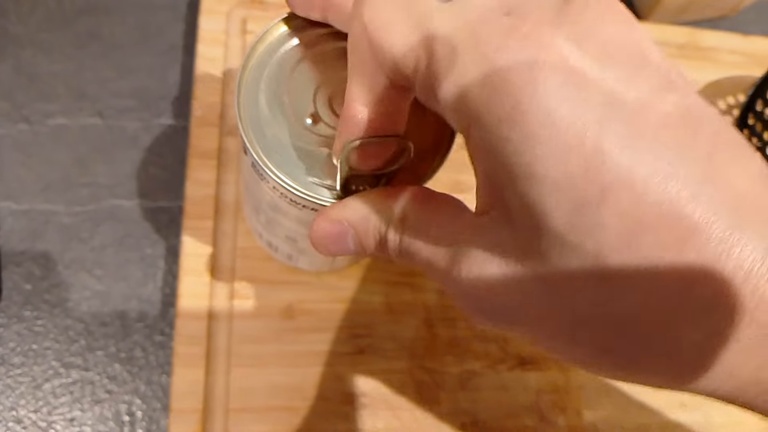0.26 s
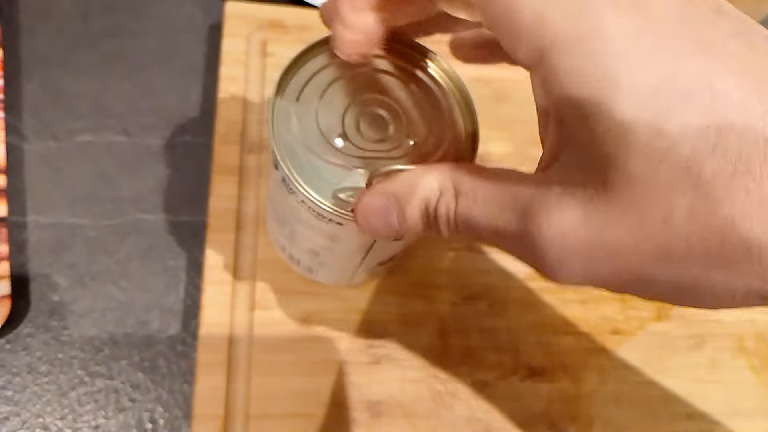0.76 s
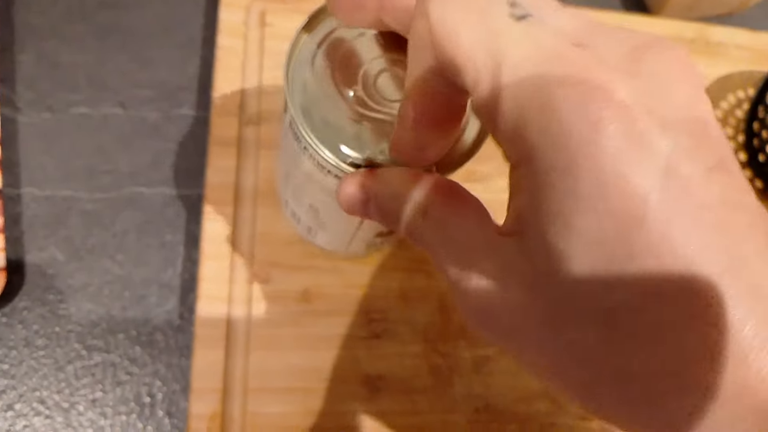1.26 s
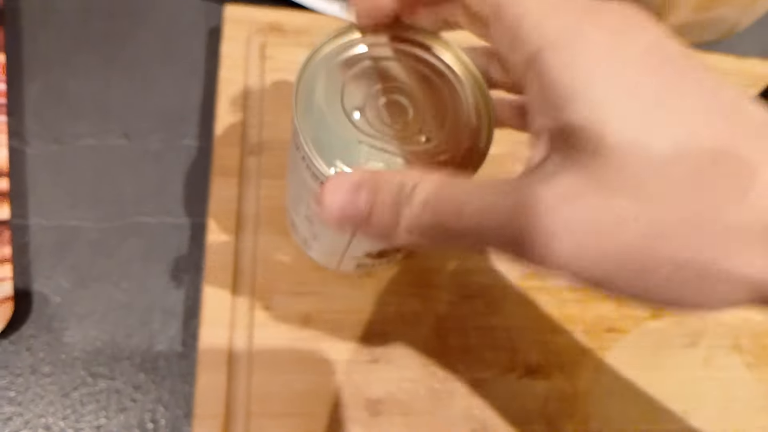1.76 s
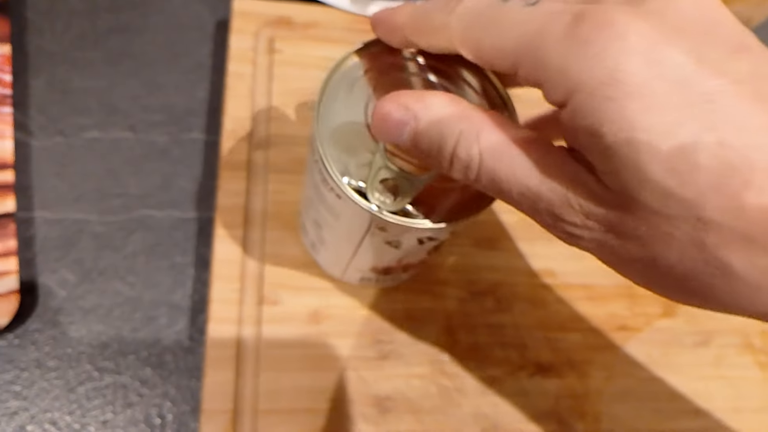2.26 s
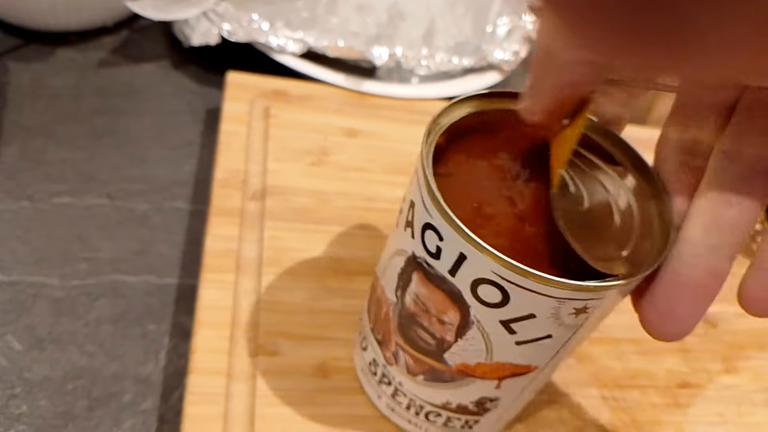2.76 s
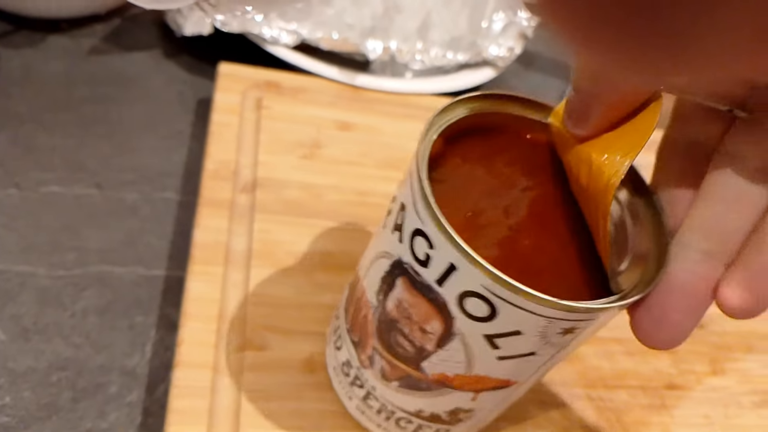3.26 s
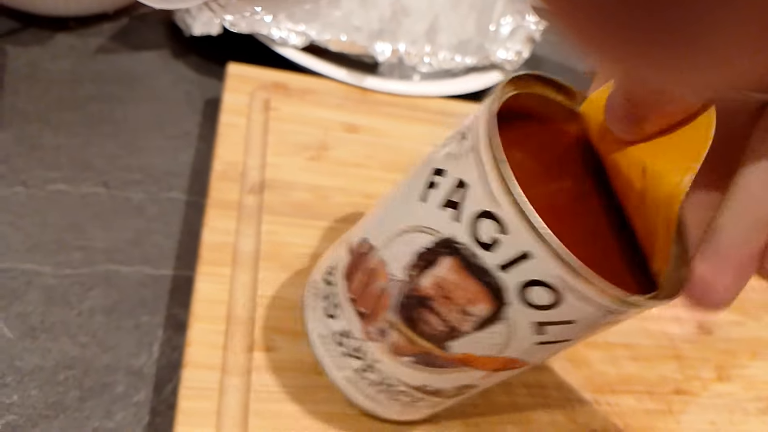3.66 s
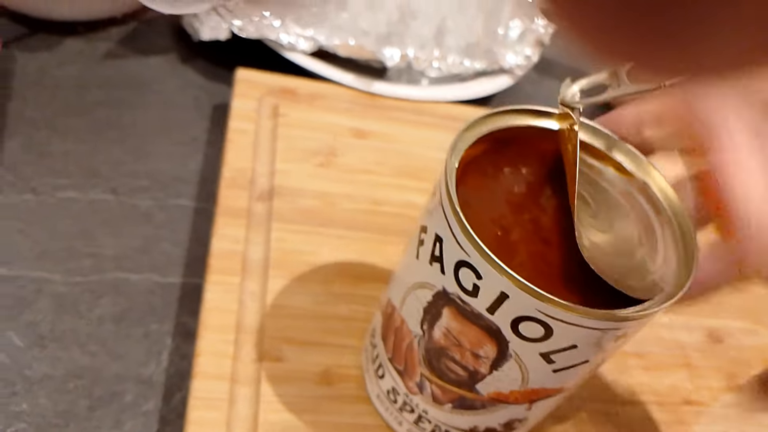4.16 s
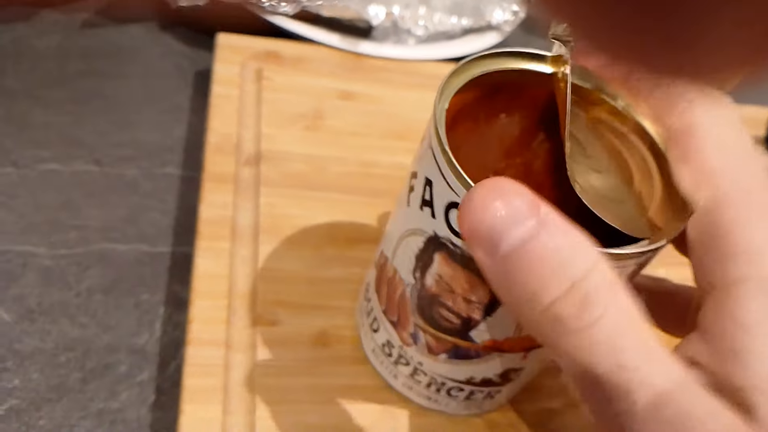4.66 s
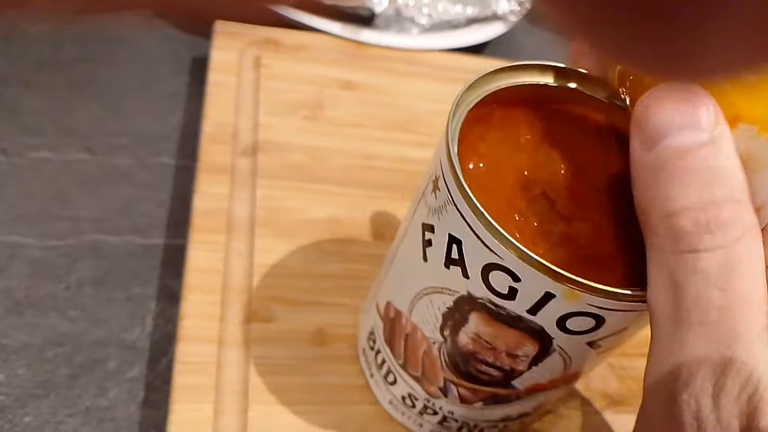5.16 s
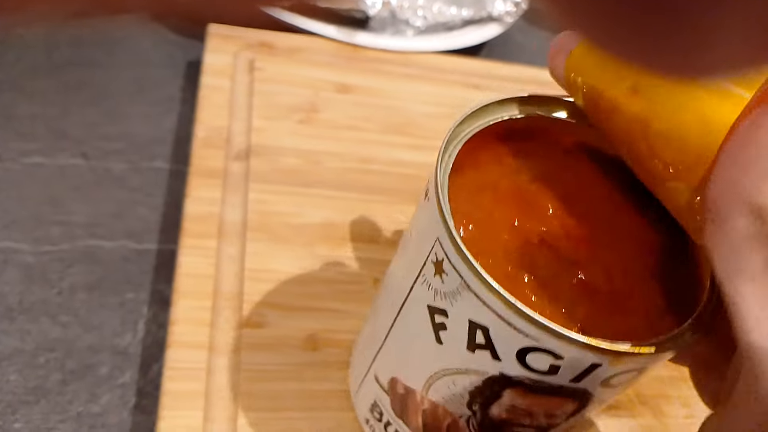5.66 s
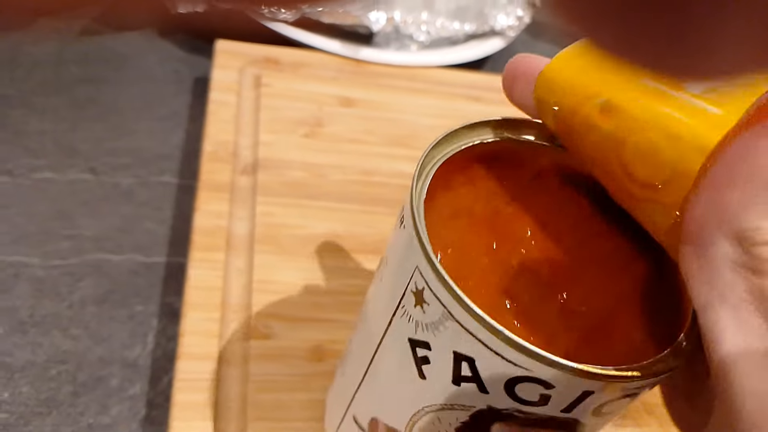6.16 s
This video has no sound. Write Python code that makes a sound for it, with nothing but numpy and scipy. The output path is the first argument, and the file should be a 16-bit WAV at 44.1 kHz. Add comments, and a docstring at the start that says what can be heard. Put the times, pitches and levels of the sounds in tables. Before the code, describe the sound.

Sharp metallic pops and small cracks as a can lid is peeled off, the full can clacking once on wood in a kitchen.

```python
"""A ring-pull tin of beans on a wooden board in a small, live kitchen, one microphone close by.
First the lid pops into new shapes as the tab pierces and lifts it. Then the scored seam tears in jerks;
midway the tin skids and drops flat. The lid snaps free near 5.1 s, and the tin knocks once more at the end.
Behind it all, a thin whine wavers over a quiet background hiss."""
import sys
import numpy as np
from scipy import signal
from scipy.fft import rfft, irfft, next_fast_len
from scipy.io import wavfile

SR = 44100
rng = np.random.default_rng(int(sys.argv[2]) if len(sys.argv) > 2 else 0)


def unload_audio(sound):
    """Save the sound as a 16-bit wav file, at the path given as the first command line argument."""
    columns = np.transpose(np.atleast_2d(sound))
    # keep every value between -1 and 1, then stretch to whole-number steps
    steps = np.round(np.clip(columns, -1, 1) * 32767)
    wavfile.write(sys.argv[1], SR, steps.astype(np.int16))


N = 282355
TIME = np.arange(N) / SR  # seconds through the scene
T = np.arange(int(.8 * SR)) / SR  # seconds through one short sound


# The lid's ring in each state, sealed to free. Each row: frequency in Hz, energy in dB, t60 in seconds.
LID_MODES = { "sealed": [(283, -16.5, .1), (478, -16.5, 0.06), (684, -4.5, 0.066), (725, -13, .19),
             (783.4, -7.5, 0.052), (1331, -10.5, 0.044), (1840, -16.5, 0.011), (2100, -24, 0.09)],
             "dented": [(300, -3.5, 0.047), (451, -4.5, 0.082), (820, -18, 0.11), (1890, -27, 0.082),
             (3000, -19, 0.071), (8000, -14, 0.015)], "pierced": [(292, -5, 0.063), (387, -9.5, 0.13),
             (476, -16, 0.056), (650, -12, 0.081), (942, -34, 0.051), (1612, -11.5, 0.11),
             (1860, -17, .035), (2920, -28, 0.18)], "lifted": [(514, -6, 0.07), (758, -8, 0.033),
             (918.6, 1.5, 0.099), (1057, -6, 0.18), (1308, -5, 0.069), (1953, -8, 0.043), (2220, -21, 0.07),
             (2630, -22.5, 0.064), (3232, -9.5, 0.12), (4280, -24, 0.071)], "peeled": [(1454, -16.5, 0.047),
             (1994, -8.5, 0.014), (3140, -13, 0.0069), (8500, -4, 0.016), (8800, -19, 0.015)],
             "free": [(295, -16, 0.059), (621, -16, .25), (3240, -16.5, 0.091), (3586, -11, 0.056),
             (3820, -7.5, 0.053), (7050, -12, 0.08), (7800, -12.5, .06), (8200, -8, .05), (9070, -8, .05),
             (10220, -6.5, 0.038)], }
# How strongly the lid sounds into the room. Each entry: state of the lid, room tail in dB.
LID_ROOM_DB = {"sealed": -7, "dented": -9, "pierced": -9.5, "lifted": -8, "peeled": -8, "free": -7}
# The sheet rattling against the tab. Each row: frequency in Hz, level in dB.
RATTLE_SPECTRUM = [(100, -0.5), (300, 5.5), (900, 1.5), (1900, -7), (2800, -10.5), (5000, -23.5),
                   (8000, -32), (15000, -51.5)]
# The worktop under the board. Each row: frequency in Hz, energy in dB, t60 in seconds.
WORKTOP_MODES = [(79.2, -1.5, .4), (95.7, -5.5, 0.35), (147, -3, 0.41), (258, -13, 0.067),
                 (288.7, -12, .35)]
# The sheet pops. Each row: start in seconds, level in dB, relative rattle and worktop in dB, lid state.
POPS = [(0.234, 0, -14, -26.5, "sealed"), (1.036, -24, -12.5, -36, "dented"),
        (1.6685, -7, -0.5, -10, "pierced"), (1.6721, -2, -8, -8.5, "pierced"),
        (1.817, -39, -2.5, 4, "pierced"), (2.025, -20.5, -4, 0.5, "pierced"),
        (2.0428, -22.5, 4, -25.5, "lifted"), (2.049, -3, -11, -12.5, "lifted"),
        (2.6898, -21, -21.5, -16, "peeled"), (5.1232, -17.5, -15, -19, "free"),
        (5.1422, -2.5, -7, -10.5, "free")]

def lid_pops():
    """Close to the microphone the sheet flips, rings, rattles against the tab and thumps the worktop."""
    out, boom = np.zeros(N), ring(WORKTOP_MODES, attack=.008)
    for start, db, rattle_db, worktop_db, state in POPS:
        rattle = packet(through(burst(swell=0.0018), click(RATTLE_SPECTRUM)))
        sheet = ring(LID_MODES[state], attack=0.00035) + amp(rattle_db) * rattle
        in_room = kitchen(sheet, LID_ROOM_DB[state], early_db=-8)
        add(out, start, amp(db) * (in_room + amp(worktop_db) * boom))
    return out


# The scored metal cracking. Each row: frequency in Hz, level in dB.
SEAM_SPECTRUM = [(200, -6), (1000, -5.5), (2000, -1.5), (3800, 2), (5700, -4), (6800, -4), (7700, 4.5),
                 (8700, 5), (9500, -8.5), (10600, -6.5), (12500, -11.5), (15500, -16)]
# The seam's jerks. Each row: start in seconds, level in dB, swell in seconds, low edge in Hz,
# relative room tail in dB.
TEARS = [(0.2355, -16.5, 0.0021, 691, -6.5), (.247, -15.5, 0.00055, 4830, -3),
         (0.2544, -17, .002, 5110, -13), (1.506, -39, 0.0011, 900, -16), (1.812, -45, .003, 4000, 3.5),
         (2.5363, -45, 0.001, 1200, -15), (2.6896, -17, 0.00019, 1970, -12.5),
         (2.9325, -43.5, 0.00025, 1010, -6), (3.7905, -30, 0.0017, 1190, -0.5),
         (3.953, -39.5, 0.0014, 6000, 2), (4.105, -40, 0.0019, 4880, 6),
         (4.7339, -45, 0.00069, 1460, -17.5), (4.832, -30.5, 0.00032, 1100, -4),
         (5.122, -11, 0.0013, 1700, -2), (5.1418, 2, 0.0015, 437, -10), (6.353, -34, 0.0012, 1700, 5.5),
         (6.373, -33, 0.0022, 1234, -10)]

def seam_tears():
    """Each jerk along the seam is a burst of tiny fractures, echoing off the worktop."""
    out = np.zeros(N)
    for start, db, swell, low_hz, room_db in TEARS:
        crack = packet(through(burst(swell), click(SEAM_SPECTRUM, low_hz)))
        add(out, start, amp(db) * kitchen(crack, room_db, early_db=-3))
    return out


# The struck board. Each row: frequency in Hz, level in dB.
WOOD_SPECTRUM = [(50, -3.5), (250, -4.5), (450, -7), (900, -2.5), (1400, -5), (2200, -5.5), (3800, -14),
                 (5500, -31), (7500, -21.5), (9500, -28), (12000, -51.5)]
# The filled tin's wall. Each row: frequency in Hz, energy in dB, t60 in seconds.
WALL_MODES = [(1453, -6, 0.014), (2050, -4, 0.014), (7470, -33, 0.014)]
# Tin on board. Each row: start in seconds, level in dB, relative worktop and room tail in dB.
KNOCKS = [(3.856, -33.5, 5.5, -3), (3.9963, -2.5, -6.5, -4.5), (4.7959, -41.5, 12, 0.5),
          (5.1451, -17.5, -3, 5.5), (6.3802, -20, 0, 3), (6.383, -20.5, -7.5, -7), (6.387, -24, -11, -3)]

def tin_knocks():
    """The full tin meets the board with a dead clack; the worktop booms after it."""
    out, boom = np.zeros(N), ring(WORKTOP_MODES, attack=0.013)
    clack = packet(click(WOOD_SPECTRUM, low_hz=60.6) + ring(WALL_MODES, attack=0.00016))
    for start, db, worktop_db, room_db in KNOCKS:
        add(out, start, amp(db) * (kitchen(clack, room_db, early_db=-7) + amp(worktop_db) * boom))
    return out


# The rubbed tin's hollow ring. Each row: frequency in Hz, energy in dB, t60 in seconds.
HOLLOW_MODES = [(600, -2.5, 0.1), (685, -9.5, 0.09), (859, -9, 0.032), (1306, -13, 0.0067),
                (1950, -16, 0.017), (2510, -15, 0.011)]

def tin_skid(start_s=3.792, peak_s=3.868, end_s=3.996, peak_db=-55, ease_db_per_s=61):
    """The tilted tin's rim sticks and slips on the wood, sounding its hollow resonances."""
    slips = rng.standard_normal(N) * unit(amp(4 * wobble(rate=300)))
    sliding = (TIME > start_s) & (TIME < end_s)
    force = amp(peak_db - ease_db_per_s * np.abs(TIME - peak_s)) * sliding
    hollow = packet(ring(HOLLOW_MODES, attack=0.00016))
    return kitchen(through(force * slips, hollow), room_db=-3)


# Pulls on the seam. Each row: start in seconds, moment it gives in seconds, final level in dB.
PULLS = [(1.57, 1.683, -69), (2.438, 2.686, -74.5), (3.706, 3.805, -69), (4.455, 4.85, -81.5),
         (4.9, 5.122, -78), (5.454, 5.71, -78.5), (6.306, 6.36, -61)]

def seam_strain(rise_db=16, release_s=.02):
    """The strain of each pull grows steadily in dB and lets go when the seam gives."""
    out = np.zeros(N)
    for start, gives, db in PULLS:
        to_go = np.clip((gives - TIME) / (gives - start), 0, 1)
        release = np.exp(-np.maximum(TIME - gives, 0) / release_s)
        out += (TIME > start) * amp(db - rise_db * to_go) * release
    return out


# The hand shifts its grip. Each row: peak time in seconds, half length in seconds, level in dB.
GRIPS = [(1.131, 0.01, -73), (1.302, 0.025, -72), (1.41, 0.016, -97), (2.328, .03, -65.5),
         (2.856, 0.052, -79), (3.518, .06, -71.5), (3.867, 0.061, -57.5), (4.626, 0.033, -76.5),
         (4.845, 0.034, -64.5), (5.0, 0.16, -80), (5.663, 0.04, -77.5), (6.389, 0.013, -41)]

def grip_force(resting_db=-90):
    """Each shift is a bell-shaped swell; between them the hand never holds quite still."""
    return amp(resting_db) + sum(amp(db) * np.exp(-((TIME - peak) / half) ** 2) for peak, half, db in GRIPS)


# The tin rubbing on the board. Each row: frequency in Hz, level in dB.
RUB_SPECTRUM = [(100, -19.5), (200, -4.5), (300, 0), (420, 3), (600, 3), (800, -9.5), (1600, -12.5),
                (2600, -16), (4000, -27.5), (8000, -53)]
# The fine crackle of strained metal. Each row: frequency in Hz, level in dB.
CRACKLE_SPECTRUM = [(800, -23.5), (2200, 3), (3800, 1.5), (6000, -7.5), (8400, 3.5), (11000, -15),
                    (15500, -14)]

def handling(grip_crackle_db=-13, rumble_db=-33, rumble_growth=0.47):
    """Small sounds heard close up: the tin rubs, seam and bent sheet crackle, the worktop rumbles."""
    rub = colour(grains(), RUB_SPECTRUM)
    crackle = colour(grains(), CRACKLE_SPECTRUM)
    worktop = ring(WORKTOP_MODES, attack=0.0028) * fade(t60=0.18)
    rumble = unit(through(grains(), worktop))
    grip = grip_force()
    strain = seam_strain() + amp(grip_crackle_db) * grip
    return grip * rub + strain * crackle + amp(rumble_db) * grip ** rumble_growth * rumble


# The whine's strength at its resting pitch. Each row: time in seconds, level in dB.
WHINE_LEVEL = [(0, -87), (.6, -75), (.75, -76), (1.3, -73), (1.55, -75), (2.36, -74), (2.42, -66.5),
               (2.6, -76), (3.15, -73), (3.55, -73), (4.4, -71), (4.75, -82.5), (5.0, -70.5), (5.5, -70),
               (5.7, -83), (6.05, -72.5), (6.4, -81)]

def whine(rest_hz=9104, drop_at_s=2.38, drop_hz=74, swing_s=.87, settle_s=1.4, louder_db_per_hz=0.0726):
    """A thin, flickering whine drops in pitch once and swings back to rest, louder when lower."""
    since = TIME - drop_at_s
    swing = np.cos(2 * np.pi * since / swing_s)
    sag_hz = drop_hz * (since > 0) * np.exp(-np.abs(since) / settle_s) * swing
    flutter_hz = 20 * wobble(rate=150)
    pitch = rest_hz - sag_hz + flutter_hz
    flicker = 1 + 0.76 * np.tanh(wobble(rate=30))
    tone = np.sin(2 * np.pi * np.cumsum(pitch) / SR) * flicker
    level_db = np.interp(TIME, *np.transpose(WHINE_LEVEL)) + louder_db_per_hz * sag_hz
    return amp(level_db) * unit(tone)


# The background hiss. Each row: frequency in Hz, level in dB.
HISS_SPECTRUM = [(20, -8), (50, 4), (85, -2), (160, -10.5), (315, -6.5), (630, -12.5), (1000, -14),
                 (2000, -18.5), (4000, -22.5), (6300, -29), (8300, -23), (12000, -35), (15500, -33)]
# The background hiss gets a little quieter towards the end. Each row: time in seconds, level in dB.
HISS_LEVEL = [(0, -70.5), (5.4, -74.5), (5.8, -76.5), (6.4, -76.5)]

def room_tone(hum_db=-85, hum_hz=145, waver_db=2):
    """Behind the tin: a quiet background hiss that wavers slightly in level, and a low appliance hum."""
    hiss_db = np.interp(TIME, *np.transpose(HISS_LEVEL)) + waver_db * wobble(rate=6.2)
    hiss = colour(rng.standard_normal(N), HISS_SPECTRUM)
    hum = unit(np.sin(2 * np.pi * hum_hz * TIME))
    return amp(hiss_db) * hiss + amp(hum_db) * hum


# How long the kitchen rings. Each row: frequency in Hz, t60 in seconds.
KITCHEN_DECAY = [(80, 0.86), (300, 0.54), (1500, 0.54), (3500, 0.55), (8000, 0.5), (15000, 0.39)]

def kitchen(direct, room_db, early_db=-9, early_t60=0.074, build_s=0.012):
    """The microphone hears the direct sound, quick worktop echoes, then a tail from the hard walls."""
    hz, t, noise = signal.stft(rng.standard_normal(len(T)), SR, nperseg=256)
    decay = np.exp(-np.log(1000) * t / along(KITCHEN_DECAY, hz)[:, None])
    tail = signal.istft(noise * decay, SR, nperseg=256)[1][:len(T)]
    tail = packet(tail * (1 - np.exp(-T / build_s)))
    early = packet(rng.standard_normal(len(T)) * fade(early_t60) * (T > .002))
    walls = np.linalg.norm(direct) * packet(through(direct, tail))
    return direct + amp(room_db) * walls + amp(early_db) * through(direct, early)


def ring(modes, attack):
    """Damped modes of alternating sign that build up over the attack time in seconds."""
    rise = 1 - np.exp(-T / attack)
    return sum((-1) ** k * amp(db) * packet(np.sin(2 * np.pi * hz * T) * fade(t60) * rise)
               for k, (hz, db, t60) in enumerate(modes))


def click(spectrum, low_hz=20):
    """The causal impulse with this spectrum, thin below the low edge."""
    hz = np.fft.rfftfreq(len(T), 1 / SR)
    high_pass = 1e-3 + hz ** 2 / np.hypot(hz ** 2, low_hz ** 2)
    cepstrum = irfft(np.log(amp(along(spectrum, hz)) * high_pass))
    cepstrum[1:len(T) // 2] *= 2  # minimum phase: the energy comes at the start
    cepstrum[len(T) // 2:] = 0
    return packet(irfft(np.exp(rfft(cepstrum))))


def burst(swell):
    """A run of tiny slips that peaks after swell seconds and dies."""
    return packet(rng.standard_normal(len(T)) * T * np.exp(-T / swell))


def grains(depth_db=4, rate=350):
    """Friction noise, roughened by quick changes of level."""
    return rng.standard_normal(N) * amp(depth_db * wobble(rate))


def wobble(rate):
    """A random curve with rate knots a second."""
    knots = np.arange(0, N / SR, 1 / rate)
    return np.interp(TIME, knots, rng.standard_normal(len(knots)))


def colour(x, spectrum):
    """Shape a steady noise; rms 1."""
    size = next_fast_len(N + SR // 4)
    gain = amp(along(spectrum, np.fft.rfftfreq(size, 1 / SR)))
    return unit(irfft(rfft(x, size) * gain, size)[:N])


def amp(db):
    """Decibels to gain."""
    return 10 ** (np.asarray(db) / 20)


def unit(x):
    """Scale to rms 1."""
    return x / np.sqrt(np.mean(x ** 2) + 1e-20)


def packet(x):
    """Scale to energy 1."""
    return x / (np.linalg.norm(x) + 1e-20)


def along(points, hz):
    """Read (Hz, value) points on a log axis."""
    freqs, values = np.transpose(points)
    return np.interp(np.log(hz + 1), np.log(freqs), values)


def fade(t60):
    """Exponential decay, 60 dB down after t60 seconds."""
    return np.exp(-np.log(1000) * T / t60)


def add(track, start, sound):
    """Mix a sound into the track from start seconds."""
    part = track[max(round(start * SR), 0):][:len(sound)]
    part += sound[:len(part)]


def through(x, response):
    """Convolve, keeping the length."""
    return signal.fftconvolve(x, response)[:len(x)]


def scene():
    """Tin, board and kitchen at one close microphone."""
    return (lid_pops() + seam_tears() + tin_skid() + tin_knocks() + handling() + whine() + room_tone())[None]


def record(dry):
    """Nothing passes above 15.7 kHz."""
    size = next_fast_len(N + SR // 4)
    passband = np.fft.rfftfreq(size, 1 / SR) < 15700
    return irfft(rfft(dry, size) * passband, size)[..., :N]


dry = scene()
out = record(dry)
unload_audio(out)
```